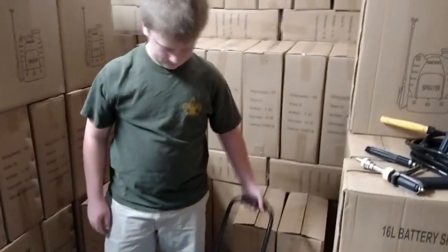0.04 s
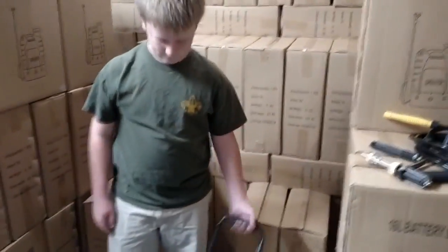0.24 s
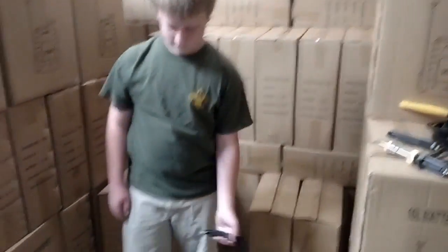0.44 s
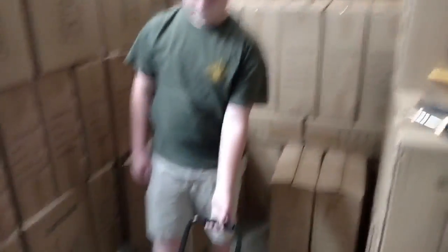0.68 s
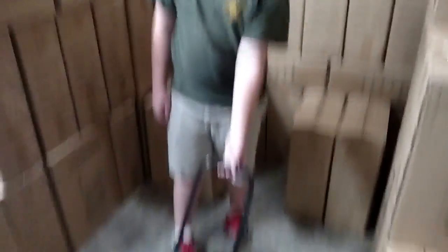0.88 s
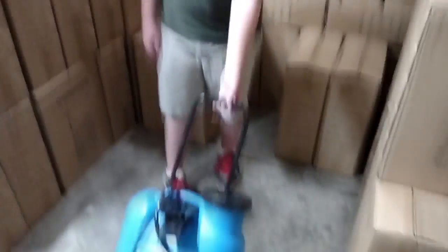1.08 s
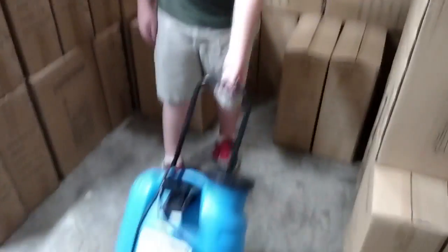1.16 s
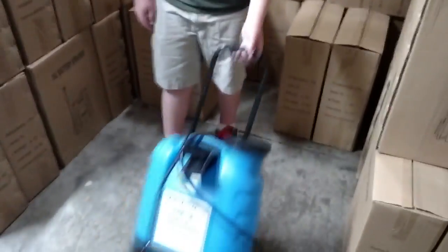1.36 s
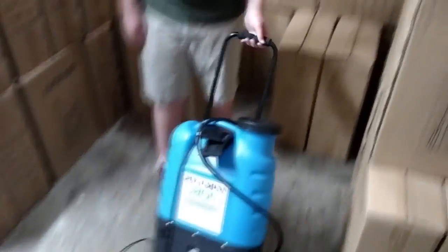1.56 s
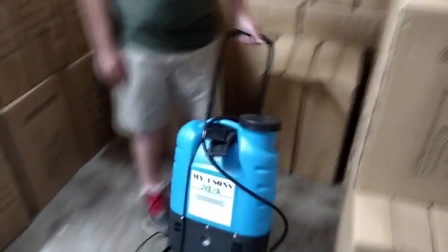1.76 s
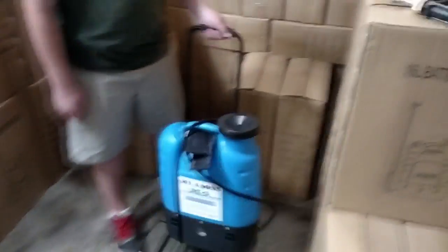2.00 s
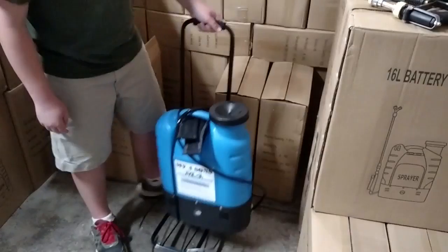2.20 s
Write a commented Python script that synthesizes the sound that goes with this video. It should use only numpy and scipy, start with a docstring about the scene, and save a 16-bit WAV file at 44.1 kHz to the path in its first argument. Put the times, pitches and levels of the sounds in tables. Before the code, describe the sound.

A loaded hand cart rolls over gritty concrete, its plastic tank drumming hollowly with thuds and metal rattles. It fades to a stop around 0.9 seconds, leaving a faint hush and low rumble. From 1.3 seconds it rolls back, louder, with more bumps and small metallic pings. At about 2.1 seconds the base scrapes briefly, then lands with a sharp, loud clack that rings briefly in the warehouse.

```python
"""A hollow, gritty drumming: a loaded hand cart rolls out over concrete on small hard wheels,
stops, and rolls back. Floor grit drums its plastic tank and shivers its metal frame;
bumps thud, loose joints rattle and small parts ping. At the end the base scrapes and is
set down with a sharp clack that rings in the warehouse, over a hush and a low rumble."""
import sys
import numpy as np
from scipy import signal
from scipy.fft import rfft, irfft
from scipy.io import wavfile
from scipy.ndimage import uniform_filter1d

SR = 44100
rng = np.random.default_rng(int(sys.argv[2]) if len(sys.argv) > 2 else 0)


def unload_wav(signal):
    """Save mono or channel-first audio to the path in sys.argv[1] as 16-bit WAV at rate SR, clipped to [-1, 1]."""
    wavfile.write(
        sys.argv[1],
        SR,
        np.round(np.clip(np.atleast_2d(signal).T, -1, 1) * 32767).astype(np.int16),
    )


N = 98651

# hollow body of the tank and its load: (pitch [Hz], width [Hz], relative level [dB])
TANK_MODES = [(158.2, 8.8, 0.5), (233.4, 39, -2.5), (282, 30, -0.5), (349.2, 57.3, -0.5), (437.7, 68, -1.5),
              (557.2, 93, 2), (667, 57, -3.5), (917, 190, -9), (1435, 690, -6.5)]
# bright resonances of the tube frame: (pitch [Hz], width [Hz], relative level [dB])
FRAME_MODES = [(1115, 615, 12), (1800, 1110, 11), (4100, 2160, 10), (5020, 83, -7), (13000, 490, -22)]


def amp(db):
    return 10 ** (np.asarray(db) / 20)


def unit_rms(x):
    return x / np.sqrt(np.mean(x ** 2) + 1e-20)


def curve_at(points, hz):
    f, value = np.transpose(points)
    return np.interp(np.log(hz + 1), np.log(f + 1), value)


def add(mix, start, sound):
    part = mix[round(start * SR):][:len(sound)]
    part += sound[:len(part)]


def coloured_noise(count, spectrum):
    """Noise through an EQ curve."""
    gain = amp(curve_at(spectrum, np.fft.rfftfreq(count, 1 / SR)))
    return irfft(rfft(rng.standard_normal(count)) * gain, count)


def ring(modes, tilt_db=0.):
    """Unit-energy impulse response of steep-sided resonances, tilted by tilt_db per octave."""
    t = np.arange(4096) / SR
    response = 0
    for hz, width, db in modes:
        gain = amp(db + tilt_db * np.log2(hz / 3000)) * width ** 1.346
        response += gain * t * np.exp(-2 * np.pi * width * t) * np.sin(2 * np.pi * hz * t)
    return response / np.linalg.norm(response)


def grains(per_s, spread_db, count):
    """Random clicks of either sign, a few of them large."""
    hits = rng.random(count) < per_s / SR
    size = amp(spread_db * np.minimum(rng.exponential(1, count), 4))
    return unit_rms(hits * size * rng.choice([-1., 1.], count))


def burst(decay_s, rise_s):
    """Envelope with a quick attack and an exponential fall."""
    t = np.arange(6000) / SR
    return (1 - np.exp(-t / rise_s)) * np.exp(-t / decay_s)


def room_tone():
    """The steady hush of the warehouse."""
    # colour of the still room: (frequency [Hz], relative level [dB])
    spectrum = [(59, -78), (100, -27), (129, -0.5), (201, -4.5), (447, -14), (1040, -20), (15500, -41)]
    return amp(-59) * unit_rms(coloured_noise(N + 1, spectrum)[:N])


def rumble():
    """A lumpy low rumble swells and fades."""
    # swell of the rumble: (time [s], level [dB])
    swell = [(0, -77), (.5, -59), (1.1, -57.5), (1.8, -52), (2.24, -65)]
    band = signal.butter(4, [25, 107], "band", fs=SR, output="sos")
    low = signal.sosfilt(band, rng.standard_normal(N))
    lumps = uniform_filter1d(uniform_filter1d(rng.standard_normal(N), size=1500), size=1500)
    level = amp(np.interp(np.arange(N) / SR, *np.transpose(swell)))
    return level * unit_rms(low * amp(2.5 * unit_rms(lumps)))


def warehouse_reverb(x):
    """Sparse reflections of random sign, the mids hanging on longest."""
    # decay of the hall: (frequency [Hz], t60 [s])
    decay = [(150, 0.25), (2000, 0.89), (12000, 0.25)]
    taps = np.zeros(SR // 2)
    slots = np.arange(300, SR // 2 - 20, 20)
    taps[slots + rng.integers(0, 20, len(slots))] = rng.choice([-1., 1.], len(slots))
    hz, t, bands = signal.stft(taps, SR, nperseg=256)
    tail = signal.istft(bands * amp(-60 * t / curve_at(decay, hz)[:, None]), SR, nperseg=256)[1]
    return signal.fftconvolve(x, tail / np.linalg.norm(tail))[:N]


def base_scrape():
    """The base drags with a brief gritty scrape just before it lands."""
    # resonances of the scrape: (pitch [Hz], width [Hz], relative level [dB])
    modes = [(2950, 510, 7), (4940, 1000, -14), (7100, 1300, 2.5)]
    start_s, end_s = 2.09, 2.155
    progress = np.clip((np.arange(N) / SR - start_s) / (end_s - start_s), 0, 1)
    friction = np.sin(np.pi * progress) ** .5 * grains(per_s=4200, spread_db=5, count=N)
    return amp(-46.5) * signal.oaconvolve(friction, ring(modes))[:N]


def metal_pings():
    """Small metal parts chatter and die away, each through one narrow resonance."""
    # pings of the small parts: (time [s], pitch [Hz], level [dB], t60 [s])
    pings = [(1.577, 5520, -49, 0.16), (1.579, 13250, -64, 0.15), (1.582, 9000, -55, 0.13),
             (1.787, 10800, -65, 0.036), (1.79, 15400, -57, 0.041), (1.883, 5540, -49, 0.17),
             (1.964, 5320, -46, 0.035), (2.078, 4970, -46, 0.028)]
    out, t = np.zeros(N), np.arange(8000) / SR
    for start, hz, db, t60 in pings:
        chatter = rng.standard_normal(len(t)) * amp(db - 60 * t / t60)
        add(out, start, signal.oaconvolve(chatter, ring([(hz, 0.042 * hz, 0)])))
    return out


def joint_rattles():
    """Loose joints ring the frame with clusters of tiny knocks."""
    # rattles: (time [s], level [dB], brightness [dB/octave], decay [s], rise [s])
    rattles = [(0.044, -44, -9, 0.0045, 0.0015), (0.204, -36.5, -31, 0.028, .03),
               (0.226, -44, -2, .012, 0.0026), (0.379, -38.5, 1.5, 0.011, 0.0006),
               (0.523, -43, -15, 0.021, .02), (0.563, -38.5, -0.2, 0.016, 0.0027),
               (0.706, -50, 3, 0.0081, 0.0013), (0.907, -62, 12, 0.013, 0.0022),
               (1.452, -40, 0.5, 0.014, 0.0011), (1.577, -37.5, -1.2, 0.012, 0.0013),
               (1.7, -47, 0.7, 0.034, 0.0024), (1.783, -35, -3, 0.012, 0.0013),
               (1.88, -33, 0.5, 0.019, 0.011), (2.075, -34.5, -0.7, .011, 0.0011)]
    out = np.zeros(N)
    for start, db, tilt_db, decay_s, rise_s in rattles:
        envelope = burst(decay_s, rise_s)
        knocks = envelope * grains(per_s=6700, spread_db=1.7, count=len(envelope))
        add(out, start, amp(db) * signal.oaconvolve(knocks, ring(FRAME_MODES, tilt_db)))
    return out


def wheel_bumps():
    """Each bump shakes the tank for a moment and sounds its hollow boom."""
    # wheels drop over bumps: (time [s], shake level [dB], boom level [dB], boom pitch [Hz])
    bumps = [(0.043, -42.5, -40, 160), (.214, -35, -25.5, 157), (.363, -31.5, -27.5, 154),
             (0.537, -38, -48.5, 148), (0.713, -35, -41.5, 156.4), (1.239, -51, -38, 119),
             (1.454, -34, -30.5, 159.3), (1.499, -36, -47, 151), (1.582, -26, -31, 150.4),
             (1.786, -28.5, -28, 174), (1.884, -28, -27, 168.6), (2.047, -31.5, -31.5, 153),
             (2.08, -31.5, -46, 162)]
    boom_rise_s, boom_t60_s = 0.016, 0.18
    shake, boom, t = np.zeros(N), np.zeros(N), np.arange(8000) / SR
    jolt = burst(decay_s=0.013, rise_s=0.0037)
    for start, shake_db, boom_db, hz in bumps:
        add(shake, start, amp(shake_db) * jolt * rng.standard_normal(len(jolt)))
        swell = (1 - np.exp(-t / boom_rise_s)) * amp(boom_db - 60 * t / boom_t60_s)
        add(boom, start, swell * np.sin(2 * np.pi * hz * t))
    return signal.oaconvolve(shake, ring(TANK_MODES, tilt_db=1))[:N] + boom


def base_clack():
    """The base plate cracks onto the floor and bounces; one mode rings on as it lifts off."""
    # landing and bounces: (time [s], plate level [dB], crack level [dB], free ring level [dB])
    impacts = [(2.1567, -28, -14.5, -42), (2.1611, -18.5, -16, -25), (2.175, -38.5, -27, -57),
               (2.201, -38, -35, -28)]
    # ring of the base plate: (pitch [Hz], relative level [dB], t60 [s])
    plate_modes = [(352, -7, 0.08), (613.5, -6, 0.11), (1638, 6, 0.027), (2100, 9, 0.013),
                   (3220, 7.5, 0.011), (3890, 4, 0.011), (7620, -3.5, 0.025)]
    # colour of the crack: (frequency [Hz], relative level [dB])
    crack_spectrum = [(350, -48), (600, -8.5), (1150, -9.5), (1860, -4), (2640, -9), (6310, -7.5),
                      (8750, -18.5), (15500, -27.5)]
    attack_s, crack_decay_s = 0.0017, 0.0053
    free_hz, free_t60_s = 1966, 0.06
    out, t = np.zeros(N), np.arange(8000) / SR
    attack = np.minimum(t / attack_s, 1)
    for start, plate_db, crack_db, free_db in impacts:
        plate = 0
        for hz, db, t60 in plate_modes:
            cycles = hz * rng.uniform(1.0, 1.03) * t + rng.random()
            plate += amp(db - 60 * t / t60) * np.sin(2 * np.pi * cycles)
        crack = unit_rms(coloured_noise(len(t), crack_spectrum)) * np.exp(-t / crack_decay_s)
        free_ring = amp(free_db - 60 * t / free_t60_s) * np.sin(2 * np.pi * free_hz * t)
        add(out, start, attack * (amp(plate_db) * plate + amp(crack_db) * crack + free_ring))
    return out


def detuned_tank(shift):
    """The tank's ring with its upper modes detuned alternately up and down."""
    upper = [(hz * (1 + shift * (-1) ** k), width, db)
             for k, (hz, width, db) in enumerate(TANK_MODES[1:])]
    return ring(TANK_MODES[:1] + upper)


def rolling():
    """Grit under the wheels drums the tank and hisses in the frame; a loose part chinks."""
    # the ride out, the stop and the ride back: (time [s], tank level [dB], hiss level [dB])
    ride = [(0.0, -47.5, -68.5), (.15, -49, -60), (.39, -42.5, -57.5), (.57, -44, -58), (.68, -46, -58),
            (.76, -48, -62), (0.851, -56, -70.5), (.97, -77, -69), (1.18, -92, -83), (1.3, -57, -69.5),
            (1.4, -49, -63.5), (1.49, -42, -56), (1.61, -43.5, -55), (1.72, -43.5, -57.5), (1.9, -39, -52),
            (2.03, -41.5, -55.5), (2.141, -36.5, -42.5), (2.2, -40.5, -39)]
    mode_shift, crossfades_per_s = 0.061, 4.0
    times, drum_db, hiss_db = np.transpose(ride)
    t = np.arange(N) / SR
    grit = grains(per_s=2500, spread_db=4, count=N) * amp(np.interp(t, times, drum_db))
    hiss_level = amp(np.interp(t, times, hiss_db))
    fine_grit = grains(per_s=3700, spread_db=1.5, count=N) * hiss_level
    chinks = grains(per_s=22, spread_db=1.4, count=N) * hiss_level
    # the drumming drifts between two slightly different tunings, filling out the hollow ring
    blend = np.pi * crossfades_per_s * t + np.sin(2 * np.pi * (t + rng.random()))
    layers = [(grit * np.sin(blend), detuned_tank(mode_shift)),
              (grit * np.cos(blend), detuned_tank(-mode_shift)),
              (fine_grit, ring(FRAME_MODES)),
              (chinks, amp(-18.5) * ring([(4800, 170, 0)]))]
    return sum(signal.oaconvolve(drive, body)[:N] for drive, body in layers)


def scene():
    """The cart and its reverb over the bed of hush and rumble, in mono."""
    cart = rolling() + wheel_bumps() + joint_rattles() + metal_pings() + base_scrape() + base_clack()
    return (cart + amp(-11.5) * warehouse_reverb(cart) + room_tone() + rumble())[None]


def record(dry):
    """A steep low-pass trims the very top of the treble."""
    cutoff_hz = 15600
    lowpass = signal.firwin(511, cutoff_hz, window=("kaiser", 9), fs=SR)
    return signal.oaconvolve(dry, lowpass[None], "same")


dry = scene()
out = record(dry)
unload_wav(out)
```